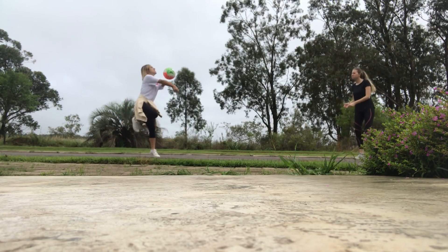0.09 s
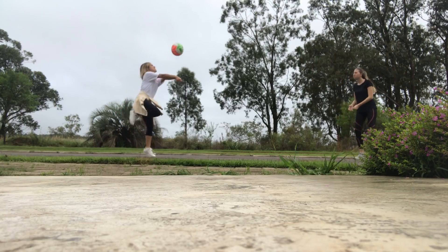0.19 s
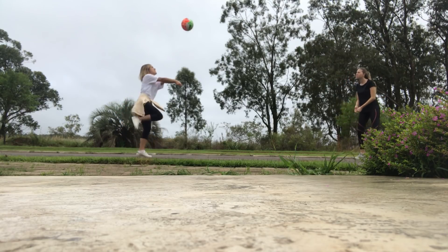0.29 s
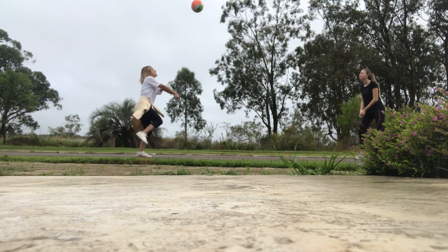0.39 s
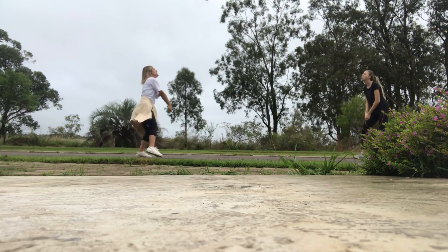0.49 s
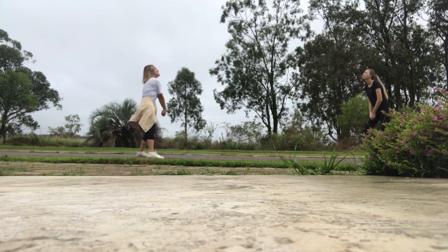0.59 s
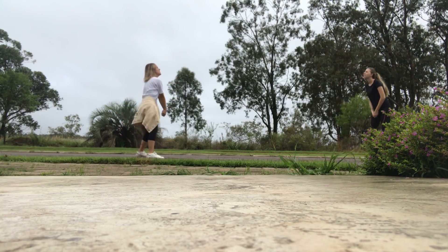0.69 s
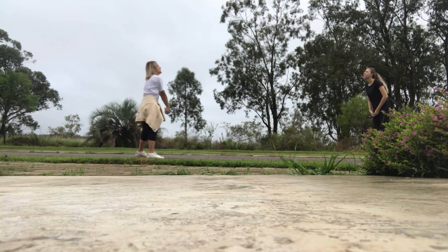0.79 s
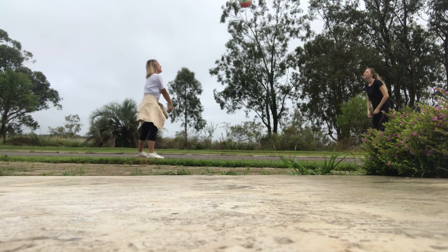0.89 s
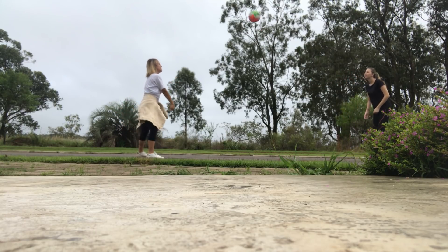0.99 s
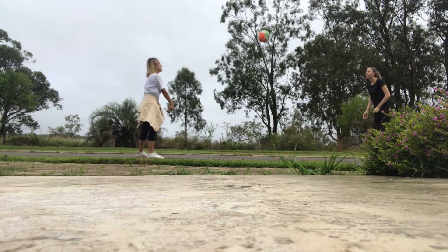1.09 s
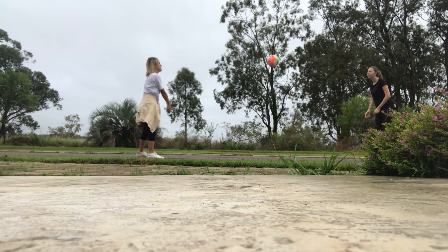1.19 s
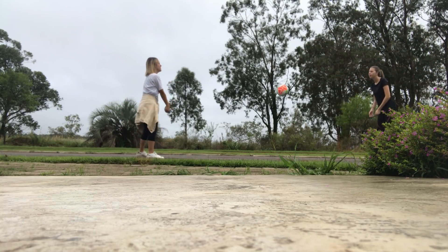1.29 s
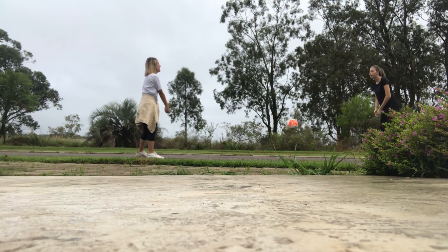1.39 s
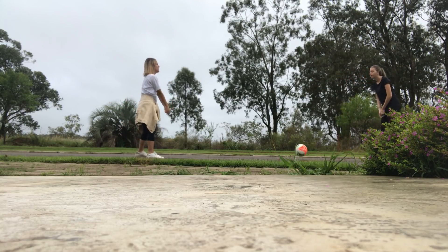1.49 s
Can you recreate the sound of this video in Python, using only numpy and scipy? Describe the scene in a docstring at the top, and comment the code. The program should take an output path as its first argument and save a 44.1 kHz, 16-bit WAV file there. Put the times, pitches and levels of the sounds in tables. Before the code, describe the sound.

A volleyball hits forearms once at about 0.2 seconds, a sharp slap with a hollow ring and a short outdoor echo. Light shoe taps on paving come just before it and continue from 0.4 to 1.5 seconds, with a scuff near 0.75. A small bird whistles faint, thin falling notes between 0.6 and 1.1 seconds. A quiet distant rumble and leaf hiss lie underneath throughout.

```python
"""On an open paved yard, a volleyball is bumped once off the forearms: skin slaps, the ball squashes,
springs free and the air inside it rings. The ground and a line of trees scatter the hit back.
Shoes tap and scuff on the paving, and a small bird whistles thin falling notes.
A distant rumble and a faint hiss of leaves lie under it all."""
import sys
import numpy as np
from scipy import signal
from scipy.fft import rfft, irfft
from scipy.io import wavfile

SR = 44100
rng = np.random.default_rng(int(sys.argv[2]) if len(sys.argv) > 2 else 0)


def file_out(sig):
    """Save sig as 16-bit WAV at sys.argv[1]."""
    # one column per channel
    cols = np.atleast_2d(sig).T
    # limit, then scale
    lim = np.clip(cols, -1, 1)
    pcm = np.round(lim * 32767).astype(np.int16)
    wavfile.write(sys.argv[1], SR, pcm)


N = 68355
T = np.arange(N) / SR
FREQS = np.fft.rfftfreq(N, 1 / SR)


def amp(db):
    """Turns decibels into a gain."""
    return 10 ** (np.asarray(db) / 20)


def unit(x):
    """Scales a signal to an average (rms) level of 1."""
    return x / np.sqrt(np.mean(x ** 2) + 1e-20)


def read(points, hz):
    """Looks up a frequency in a table, blending between rows on a log-frequency axis."""
    freqs, values = np.transpose(points)
    return np.interp(np.log(hz + 1), np.log(freqs + 1), values)


def add(mix, start_s, sound):
    """Mixes a sound in at the given time."""
    part = mix[max(round(start_s * SR), 0):][:len(sound)]
    part += sound[:len(part)]


def noise(colour):
    """Noise of level 1. Its colour says how strong each frequency is next to the others."""
    return unit(irfft(rfft(rng.standard_normal(N)) * amp(read(colour, FREQS)), N))


def wander(hz):
    """A smooth random wobble of level 1, mostly slower than hz."""
    return unit(irfft(rfft(rng.standard_normal(N)) * np.exp(-(FREQS / hz) ** 2), N))


def fade(fade_s, t=T):
    """Dies away by 60 dB over the fade time."""
    return np.exp(-np.log(1000) * t / fade_s)


def hump(centre_s, width_s):
    """A smooth, bell-shaped rise and fall."""
    return np.exp(-((T - centre_s) / width_s) ** 2 / 2)


def click(colour, size=2048):
    """A click of the given colour, with its energy (1 in all) packed at the start."""
    log_gain = np.log(amp(read(colour, abs(np.fft.fftfreq(size, 1 / SR)))))
    spectrum = np.exp(np.conj(signal.hilbert(log_gain)))
    pulse = np.fft.ifft(spectrum).real[:size // 2]
    return pulse / np.linalg.norm(pulse)


def ring(tones):
    """Pure tones that start together and die away."""
    return sum(amp(db) * fade(fade_s) * np.sin(2 * np.pi * hz * T) for hz, db, fade_s in tones)


def outdoors(bump_s=1.7, bump_hz=94):
    """Distant rumble and faint leaf hiss waver slightly."""
    # colour of the rumble and hiss: (frequency [Hz], level [dB])
    background = [(20, -33), (40, -5), (65, 2), (110, -8), (300, -16.5), (500, -24.5), (1000, -31),
                  (2000, -39), (4000, -41), (6500, -42.5), (10000, -49.5), (16000, -48)]
    bump = amp(-45.5) * hump(bump_s, width_s=0.0098) * np.cos(2 * np.pi * bump_hz * (T - bump_s))
    return bump + amp(-52.5 + 0.37 * wander(hz=16)) * noise(background)


def footsteps(rise_s=0.0013):
    """Each shoe lands with a thud, a tap of the sole and a crunch of grit."""
    # footfalls: (time [s], thud level [dB], tap level [dB], tap pitch [Hz], grit level [dB], decay [s])
    steps = [(0.042, -43, -47, 1280, -54, 0.0086), (0.09, -64, -55.5, 1400, -63, 0.0024),
             (.408, -41, -56, 1290, -66, 0.0097), (0.505, -41, -45.5, 1020, -60.5, 0.0033),
             (0.604, -51, -53, 1140, -60, 0.0081), (0.609, -47, -55, 1250, -55.5, 0.0057),
             (0.986, -58.5, -60, 650, -64, 0.02), (1.027, -54, -57, 860, -63.5, 0.0038),
             (1.234, -53, -71, 604, -82, 0.014), (1.317, -52, -66, 700, -86, 0.0046),
             (1.437, -58, -60, 1600, -60.5, 0.0045), (1.476, -49.5, -58, 780, -64.5, 0.0047)]
    # colour of the sole's tap: (multiple of its pitch, level [dB])
    tap_colour = [(.27, -10.5), (.7, -6.5), (1, 3), (1.35, -8), (2.7, -22), (7, -49)]
    # colours of the thud and the grit: (frequency [Hz], level [dB])
    thud_colour = [(60, -21), (190, 4), (350, 5), (540, -24), (2000, -48)]
    grit_colour = [(600, -35), (1800, 5.5), (3800, 3), (6500, -4), (9000, -18.5), (16000, -14)]
    out = np.zeros(N)
    for start_s, thud_db, tap_db, tap_hz, grit_db, decay_s in steps:
        tap = amp(tap_db) * noise([(tap_hz * multiple, db) for multiple, db in tap_colour])
        thud = amp(thud_db) * noise(thud_colour)
        grit = amp(grit_db) * noise(grit_colour)
        blow = np.minimum(T / rise_s, 1) * np.exp(-np.maximum(T - rise_s, 0) / decay_s)
        add(out, start_s, blow * (thud + tap + grit))
    return out


def slap(crackle_hz=4640):
    """Skin meets the ball: a crack, its reflection, and a bright crackle as the contact spreads."""
    # the crack and its reflection off the paving, just under a millisecond later: (delay [s], level [dB])
    clicks = [(0, -18.5), (.0009, -0.5)]
    # colour of the slap: (frequency [Hz], level [dB])
    slap_colour = [(150, 11), (490, -6), (640, 15), (1000, 4.5), (1300, 11.5), (1750, -2.5), (2200, 10.5),
                   (2840, -7.5), (3250, 3.5), (3700, 7.5), (4300, -11.5), (5100, -5), (6000, -1),
                   (7100, -5.5), (8000, -13), (9500, -7), (16000, -10)]
    treble_only = signal.butter(2, crackle_hz, "high", fs=SR, output="sos")
    contact = 0.12 * signal.sosfilt(treble_only, rng.standard_normal(N)) * fade(0.015)
    for delay_s, db in clicks:
        add(contact, delay_s, amp([db]))
    return -signal.fftconvolve(contact, click(slap_colour))[:N]


def cover_buzz():
    """The ball's cover buzzes while it is pressed."""
    # colour of the buzz: (frequency [Hz], level [dB])
    buzz_colour = [(2700, -28), (3200, 5.5), (3750, 0), (4400, -28)]
    return amp(-40) * noise(buzz_colour) * fade(0.05)


def ground_bounce(sound, dip_hz=499, width_hz=180):
    """Sound bouncing off the paving arrives out of step and cancels one band of the lower middle."""
    return signal.lfilter(*signal.iirnotch(dip_hz, dip_hz / width_hz, fs=SR), sound)


def yard_echoes(near_rise_s=0.0029, far_rise_s=0.0063):
    """The hit comes back from the ground and shrubs, as a low tail, and as soft echoes from trees."""
    # colours of the near scatter, the yard's tail and the leafy echoes: (frequency [Hz], level [dB])
    near_colour = [(100, 1), (330, 15), (520, -11), (2800, -4.5), (3500, 1), (4600, -6.5), (7000, -9),
                   (10000, -19), (16000, -20)]
    tail_colour = [(30, -11), (65, 0), (130, -1.5), (300, -3), (500, -23.5), (1000, -26), (1700, -43),
                   (3500, -37.5), (6000, -52), (16000, -49)]
    leaf_colour = [(300, -6), (1300, 4.5), (5000, -2.5), (8500, -2.5), (16000, -16)]
    # how long the tail lingers: (frequency [Hz], fade time [s])
    tail_fades = [(70, 0.93), (250, 0.31), (1000, 0.53), (3500, 0.87), (12000, 0.49)]
    # echoes from the trees: (delay [s], spread [s], level [dB])
    trees = [(.076, 0.017, -61), (0.146, 0.02, -62), (.22, 0.041, -69)]
    near = amp(-39) * noise(near_colour) * fade(0.11) * np.minimum(T / near_rise_s, 1)
    # split noise into bands so that each fades at its own speed
    hz, times, bands = signal.stft(noise(tail_colour), SR, nperseg=1024)
    bands *= fade(read(tail_fades, hz)[:, None], times)
    tail = amp(-34.5) * signal.istft(bands, SR)[1][:N]
    echoes = sum(amp(db) * hump(delay_s, spread_s) for delay_s, spread_s, db in trees)
    return near + np.minimum(T / far_rise_s, 1) * (tail + echoes * noise(leaf_colour))


def squash(start_hz=325, rest_hz=65.7, drop_s=0.0031, length_s=0.012):
    """A falling thump: the squashed ball swings more slowly as more of it touches the skin."""
    hz = rest_hz + (start_hz - rest_hz) * np.exp(-T / drop_s)
    return amp(-11) * np.exp(-(T / length_s) ** 2) * np.sin(2 * np.pi * np.cumsum(hz) / SR)


def ball_ring(rise_s=0.0011):
    """The ball rings hollow. It is not quite round, so each air tone has a twin and the two pulse."""
    # short hollow ring: (pitch [Hz], level [dB], fade time [s])
    hollow = [(390, -21, 0.042), (760, -20, 0.018), (1002, -20, 0.028), (1190, -23.5, 0.024),
              (1420, -26, 0.019)]
    # air ringing inside: (pitch [Hz], level of the pair [dB], fade time [s], gap between twins [Hz])
    air_tones = [(1858, -43, .135, 1.7), (2516, -47, 0.23, 4.7), (3267, -51, 0.59, 8.3),
                 (4340, -51.5, 0.062, 2)]
    twins = [(hz + side * gap / 2, db, fade_s) for hz, db, fade_s, gap in air_tones for side in (-1, 1)]
    return np.minimum(T / rise_s, 1) * (ring(hollow) + ring(twins) / 2)


def release(delay_s=0.015):
    """The ball springs free with a low pop; its cover peels off the skin with a faint hiss."""
    peel = amp(-47) * rng.standard_normal(N) * hump(delay_s, width_s=0.0016)
    pop = amp(-22) * hump(delay_s, width_s=0.00065)
    return peel - pop


def scuffs(grain_db=2):
    """Soles slide over the paving with a grainy rasp that grows and eases with the pressure."""
    # sliding soles: (time [s], length [s], level [dB])
    slides = [(.555, .04, -66.5), (0.745, 0.047, -53), (1.453, 0.033, -64.5)]
    # colour of the rasp: (frequency [Hz], level [dB])
    rasp_colour = [(150, -21), (400, 1), (1900, -1), (2480, -3.5), (3500, 1.5), (4750, -8), (9000, -17),
                   (16000, -33)]
    out = np.zeros(N)
    for start_s, length_s, db in slides:
        pressure = np.sqrt(np.interp(T / length_s, [0, 0.4, 1], [0, 1, 0]))
        rasp = unit(noise(rasp_colour) * amp(grain_db * wander(hz=352)))
        add(out, start_s, amp(db) * pressure * rasp)
    return out


def bird(waver=0.004, flutter_db=2.0, edge_s=0.0033):
    """Thin gliding whistles from both sides of the bird's voice box, blurred by leaves."""
    # one list of points for each whistle: (time [s], pitch [Hz], level [dB])
    whistles = [
        [(.638, 7790, -84), (.695, 7550, -71), (.712, 7060, -66.5), (.73, 6560, -62), (.75, 6180, -65),
         (.82, 5450, -68), (.872, 4930, -87)],
        [(.72, 6700, -68), (.727, 5800, -68), (.735, 4900, -73), (.748, 4350, -75)],
        [(.708, 5800, -73), (.718, 5050, -72), (.732, 4400, -80)],
        [(.718, 7350, -73), (.74, 7070, -76), (.772, 6860, -81)],
        [(.778, 6050, -75), (.809, 6700, -75), (.843, 6920, -78.5), (.878, 6720, -86)],
        [(.99, 10100, -89), (1.025, 8950, -79), (1.08, 7850, -91)],
    ]
    out = np.zeros(N)
    for curve in whistles:
        times, hz, db = np.transpose(curve)
        pitch = np.interp(T, times, hz) * (1 + waver * wander(hz=145))
        on_off = np.clip(np.minimum(T - times[0], times[-1] - T) / edge_s, 0, 1)
        level = amp(np.interp(T, times, db) + flutter_db * wander(hz=81))
        out += on_off * level * np.sqrt(2) * np.sin(2 * np.pi * np.cumsum(pitch) / SR)
    leaves = rng.standard_normal(N) * fade(0.23)
    return out + amp(-6) * signal.fftconvolve(out, leaves / np.linalg.norm(leaves))[:N]


def scene(hit_s=0.1993):
    """The open air, the players' feet, the bird and one bump of the ball, in one channel."""
    out = outdoors() + footsteps() + scuffs() + bird()
    ball = slap() + cover_buzz() + release()
    add(ball, start_s=0.0021, sound=squash())
    add(ball, start_s=0.0128, sound=ball_ring())
    add(out, hit_s, ground_bounce(ball) + yard_echoes())
    return out[None]


def record(dry, low_hz=47.5, high_hz=16400):
    """Softens the deepest bass and cuts off the highest treble."""
    bass_cut = signal.butter(2, low_hz, "high", fs=SR, output="sos")
    treble_cut = signal.firwin(255, high_hz, window=("kaiser", 9), fs=SR)
    return signal.oaconvolve(signal.sosfilt(bass_cut, dry), treble_cut[None], "same")


dry = scene()
out = record(dry)
file_out(out)
```